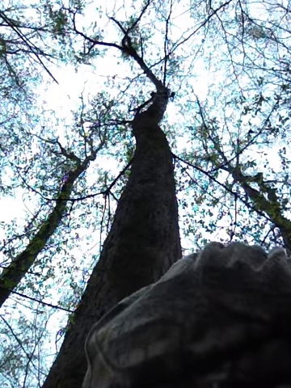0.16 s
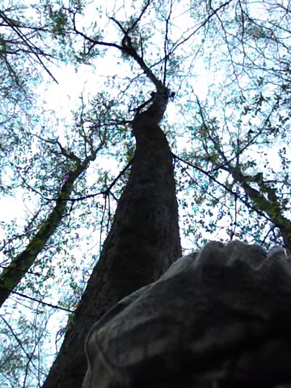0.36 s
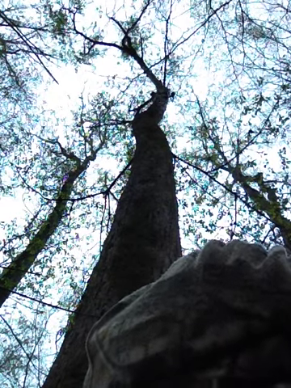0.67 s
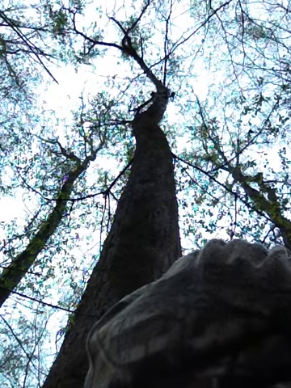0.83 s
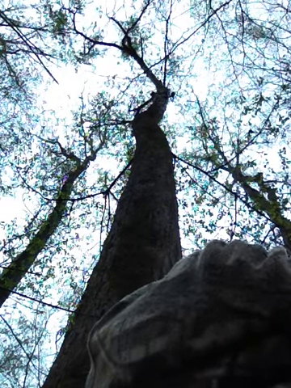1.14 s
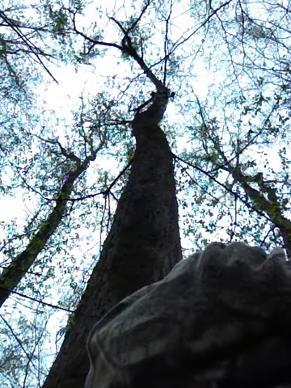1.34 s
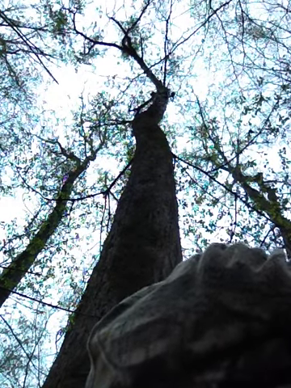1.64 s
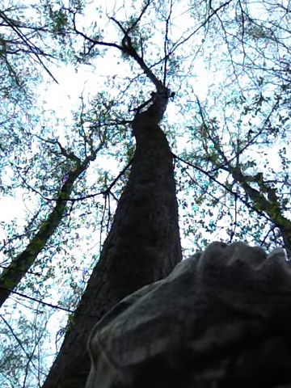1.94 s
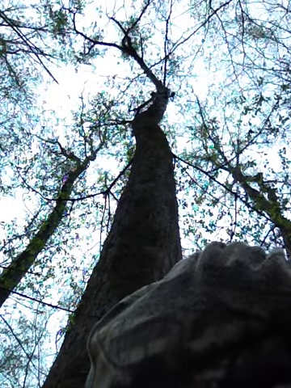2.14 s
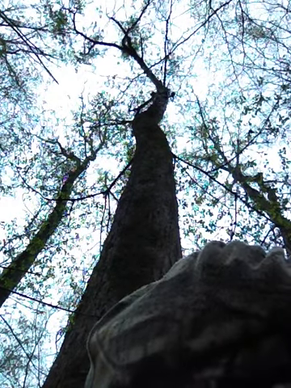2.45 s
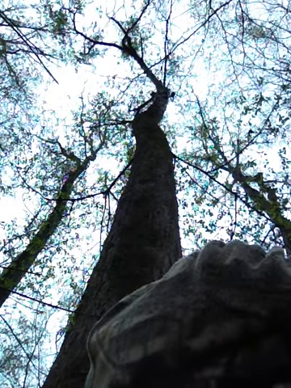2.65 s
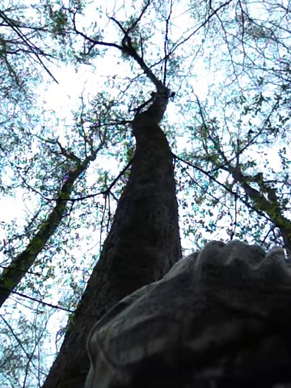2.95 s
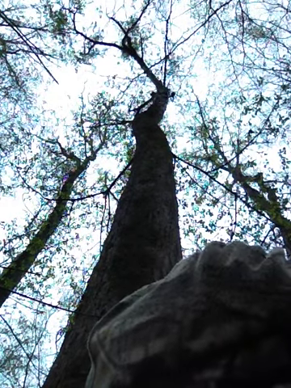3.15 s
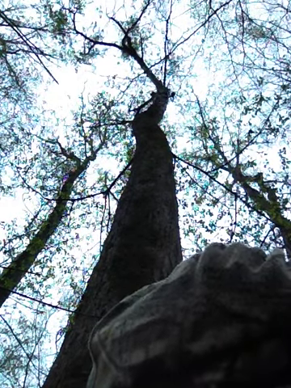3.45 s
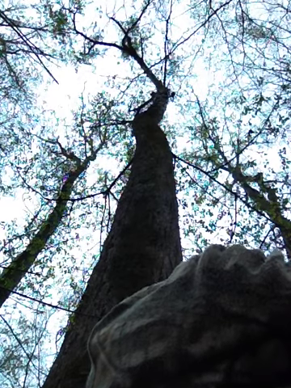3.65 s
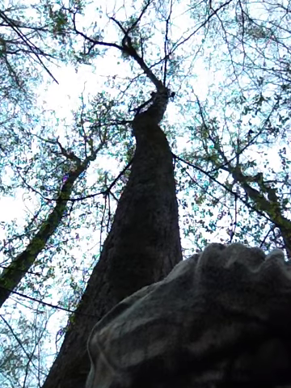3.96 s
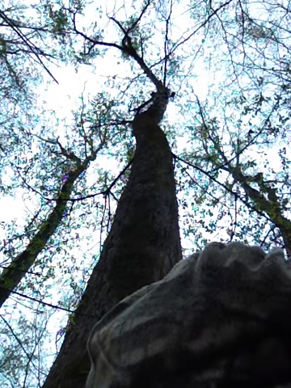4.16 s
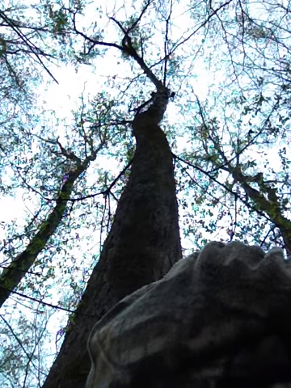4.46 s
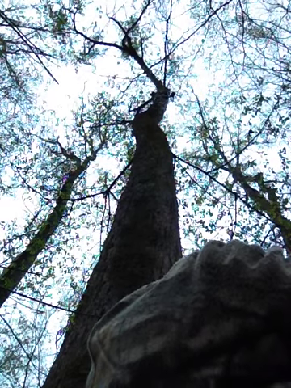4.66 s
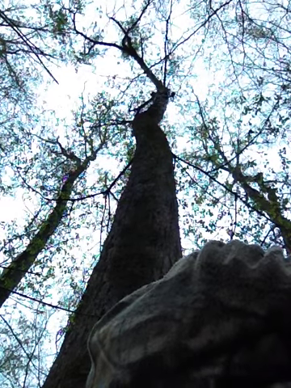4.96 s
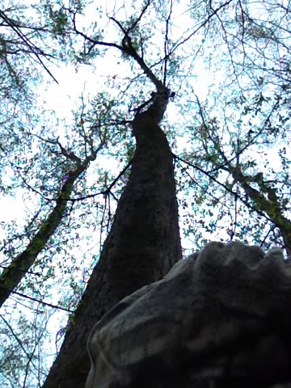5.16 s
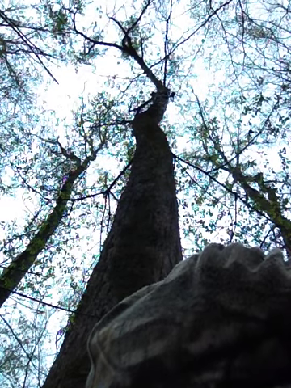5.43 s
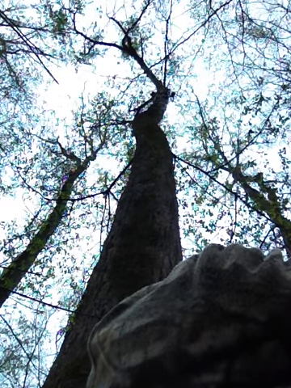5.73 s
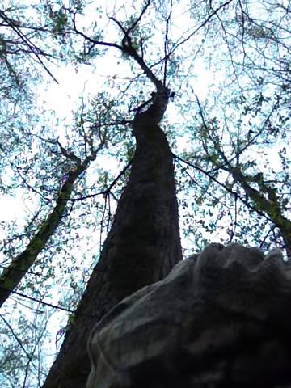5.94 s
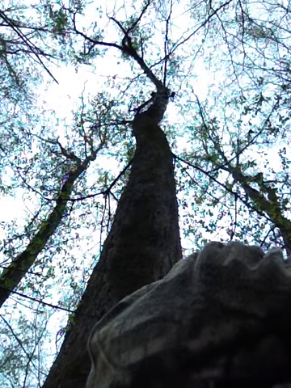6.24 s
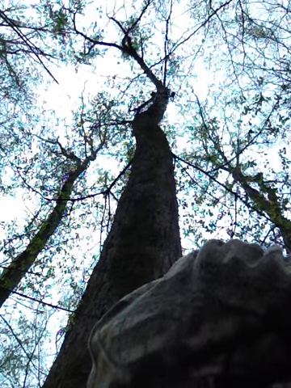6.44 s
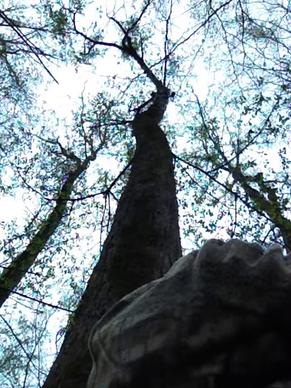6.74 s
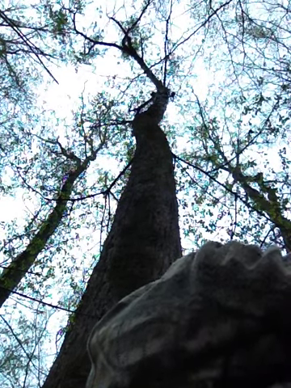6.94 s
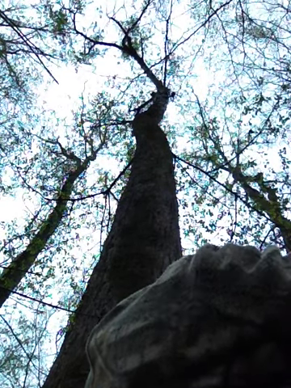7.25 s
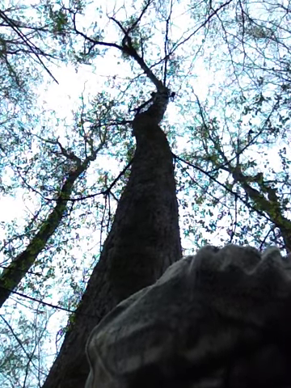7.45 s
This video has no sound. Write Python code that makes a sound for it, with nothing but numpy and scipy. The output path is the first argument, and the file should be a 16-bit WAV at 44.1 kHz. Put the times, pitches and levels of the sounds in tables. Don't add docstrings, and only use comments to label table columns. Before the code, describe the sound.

Quiet woodland in mono: low distant rumble, a wavering far engine hum and light hiss, with tiny bright leaf ticks close by, busiest in the first two seconds. From about 0.8 s a wild turkey some way off yelps five times until 1.9 s, the first two quick and weaker, the rest louder. Each yelp is a very short, reedy clear note opening with a small pop, sliding upward and cutting off, leaving a faint tail among trunks. Between 2.1 and 3 s come faint snaps and drips while the hum swells. Three quick yelps follow at 3.1 to 3.5 s. A third run starts softly at 4.25 s and strengthens, eight yelps spaced roughly a third of a second apart until 6.8 s, the later ones differently coloured as the head turns and drops. At 7.3 s a rapid double knock on a hollow casing sounds with dry snaps, then quiet.

```python
import sys
import numpy as np
from scipy import signal
from scipy.fft import rfft, irfft
from scipy.io import wavfile
from scipy.ndimage import uniform_filter1d

SR = 44100
rng = np.random.default_rng(int(sys.argv[2]) if len(sys.argv) > 2 else 0)


def unload_audio(sound):
    columns = np.transpose(np.atleast_2d(sound))
    steps = np.round(np.clip(columns, -1, 1) * 32767)
    wavfile.write(sys.argv[1], SR, steps.astype(np.int16))


def how_loud(loudness_db):
    steps = np.asarray(loudness_db, float) / 20
    return 10 ** steps


N = 335160


def at_hz(points, hz):
    points = np.array(points)
    return np.interp(np.log(hz), np.log(points[:, 0]), points[:, 1])


def drift(rate_hz, size):
    r = np.exp(-2 * np.pi * rate_hz / SR)
    slow = signal.lfilter([1], [1, -2 * r, r * r], rng.standard_normal(size + 4000))[4000:]
    return slow / np.sqrt((1 + r * r) / (1 - r * r) ** 3)


def ring(hz, t60):
    t = np.arange(4000) / SR
    return np.sin(2 * np.pi * hz * t) * how_loud(-60 * t / t60)


def bandpass(order, low_hz, high_hz, x):
    return signal.sosfilt(signal.butter(order, [low_hz, high_hz], "band", fs=SR, output="sos"), x)


def add(track, s, sound):
    i = round(s * SR)
    track[i:i + len(sound)] += sound[:max(N - i, 0)]


def turkey():
    # start t/s, crest t/s, lowest pitch f/Hz, pitch at the crest f/Hz, level/dB
    yelps = [(0.779, 0.8009, 704, 840, -33.5), (0.93, 0.9523, 716, 873, -30),
             (1.199, 1.2531, 712, 935, -24), (1.536, 1.571, 711, 943.5, -23.5),
             (1.872, 1.9076, 727, 934.6, -22.5), (3.12, 3.1436, 756, 930, -28),
             (3.2734, 3.2971, 684, 930, -24.5), (3.492, 3.52, 699, 951, -22.5),
             (4.254, 4.2796, 698, 920, -31), (4.542, 4.5998, 723, 916, -35), (4.9, 4.9824, 635.5, 948, -30),
             (5.275, 5.3385, 635.4, 960, -24.5), (5.654, 5.7224, 646, 966, -23.5),
             (6.029, 6.0943, 649, 956, -23.5), (6.3975, 6.456, 653, 944, -24),
             (6.769, 6.8245, 639.6, 953.5, -24)]
    turns_at_s = (2.5, 4.0, 4.75, 5.9)
    pops_db = [-8, -9.5, -2, -5.5, -6]
    pocket = signal.butter(3, [4850, 5700], "bandstop", fs=SR, output="sos")
    windpipe = signal.butter(6, 590, "high", fs=SR, output="sos")
    tract = np.vstack([pocket, windpipe])
    pop_rise = np.minimum(np.arange(4000) / SR / 0.004, 1)
    out = np.zeros(N)
    for row in yelps:
        start, db = row[0], row[4]
        head = np.searchsorted(turns_at_s, start)
        call = yelp(row, head)
        pop = how_loud(db - 0.5 + pops_db[head]) * 1.4 * ring(930, 0.04) * pop_rise
        add(call, .0025, pop[:len(call) - 200])
        add(out, start - .004, trunks(signal.sosfilt(tract, call)))
    return out


def yelp(row, head):
    # f/Hz, level/dB
    facing = [(1300, -3), (1800, 7), (2030, -4), (2250, -3), (2500, -3.5), (2750, -25.5), (3100, -15),
              (3600, -6.5), (4000, -10.5), (4200, -18.5), (4750, -21.5), (5300, -66.5), (7000, -32),
              (8000, -58.5)]
    # f/Hz, level/dB
    turned = [(1250, -6), (1850, 5), (2050, -7.5), (2400, -2), (2650, -23.5), (2950, -11.5), (3250, -18),
              (3550, -6), (3800, -11), (4300, -20.5), (4750, -27), (5350, -56), (7000, -28.5), (8200, -54)]
    # f/Hz, level/dB
    lowered = [(1250, -1.5), (1850, 2), (2100, -2), (2400, -19), (2650, -22), (2950, -13), (3250, -9.5),
               (3550, -20), (3850, -14), (4300, -33), (4750, -33.5), (5350, -50), (7000, -37), (8200, -59)]
    throat = (facing, facing, facing, turned, lowered)[head]
    start, crest, _, crest_hz, db = row
    size = round((round(crest - start, 2) + .05) * SR)
    t = start - .004 + np.arange(size) / SR
    age = np.maximum(t - start, 0)
    hz, low_db, high_db, tilt_db, third_db = (uniform_filter1d(c, size=70) for c in effort(row, t, head))
    start_db = -8000 * np.maximum(start - t, 0)
    after_ms = np.maximum(t - crest - .009, 0) * 1000
    phase = 2 * np.pi * np.cumsum(hz * (1 + .005 * drift(200, size))) / SR

    order = np.arange(2, 13)[:, None]
    shimmer_db = 1.13 * order ** .5 * np.array([drift(190, size) for k in order])
    colour_db = tilt_db * np.log2(order / 2) + third_db * (order == 3)
    gains = how_loud(at_hz(throat, order * hz) + colour_db + shimmer_db)
    gains /= np.sqrt(np.sum(gains ** 2, axis=0))
    top_db = 3.0 - 11 * np.exp(-age / .01) + .25 * (db + 24)
    gains *= how_loud(top_db * (order * hz > 5300))
    parted_s = t - crest + 0.0027 + .00007 * max(940 - crest_hz, 0)
    parted_ms = np.maximum(parted_s, 0) * 1000
    gains[0] *= how_loud(-2.5 * parted_ms)
    gains[1:] *= how_loud(-4.0 * parted_ms)
    overtones = np.sum(gains * np.cos(order * phase - 0.7 * order), axis=0)

    leak = how_loud(-25) + how_loud(-8) * np.exp(-age / .004)
    air = rng.standard_normal(size) * (1 - np.cos(phase))
    breath = bandpass(9, 800, 4700, leak * air)
    breath += how_loud(-48.5) * bandpass(2, 11500, 13200, air)

    low = how_loud(low_db - 3.3 * after_ms) * np.sin(phase)
    high = how_loud(high_db - 7.0 * after_ms) * (overtones + how_loud(-3.0 * parted_ms) * breath)
    return np.sqrt(2) * how_loud(start_db) * (low + high)


def effort(row, t, head):
    # creep f/Hz, overtone swell in the sweep level/dB, brightness while low dB/octave,
    # brightness in the sweep dB/octave, third partial level/dB
    heads = [
        (49.4, -4.5, 2, 6.5, 1.5),
        (50.1, -4, 0.5, 6.5, -3),
        (46.7, -2.5, -2.5, 7.5, -3.5),
        (186.3, 1.5, -5, 2, -6),
        (191, 4, 0, 1, -1),
    ]
    # f/Hz, level/dB
    pipe = [(640, -18.5), (720, -25.5), (780, -17), (850, -6), (900, -2.5), (950, 1.5), (1010, 9)]
    start, crest, low_hz, crest_hz, db = row
    creep_hz, swell_db, dull_db, bright_db, third_db = heads[head]
    age, late, length = np.maximum(t - start, 0), t - crest, crest - start

    dip_s, knee_hz = .007, 33.8
    creep = low_hz + creep_hz * np.maximum(age - dip_s, 0) / length
    sweep_hz_per_s = 11780 * how_loud(-.35 * (db + 24))
    pull = crest_hz + sweep_hz_per_s * np.minimum(late, 0.0032)
    catch = 128.5 * np.exp(-age / 0.0025)
    hz = creep + knee_hz * np.logaddexp(0, (pull - creep) / knee_hz) + catch
    swept = np.clip((hz - 800) / 110, 0, 1)

    closing_ms = 1000 * np.clip(late + 0.0012, 0, .0105)
    low_db = db + at_hz(pipe, hz) - 0.33 * closing_ms ** 2
    attack_db = -7.5 * np.exp(-age / 0.0016)
    build_db = -8.5 * np.exp(-age / 0.086 / length)
    high_db = db + attack_db + build_db + swell_db * swept
    sag_db = [-4.5, -4, -2.5, 0.5, -1.5][head]
    high_db += sag_db * np.exp(-((hz - 802) / 24) ** 2) * (age > dip_s)
    tilt_db = dull_db + (bright_db - dull_db) * swept
    return hz, low_db, high_db, tilt_db, np.full(len(t), third_db)


def trunks(x):
    t = np.arange(round(1.5 * SR)) / SR
    near, far = rng.standard_normal((2, len(t))) * np.clip(t / 0.0073, 0, 1)
    near_decay = how_loud(-50.0 - 60 * t / 0.24) + how_loud(-69.0 - 60 * t / 1.4)
    near = signal.lfilter([1, -.4], [1], near) * near_decay
    far = bandpass(1, 900, 2500, far) * how_loud(-76.5 - 60 * t / 3.06)
    path = near + far
    path[0] = 1
    add(path, .016, how_loud(-25.5) * np.hanning(24) / 12)
    return signal.fftconvolve(x, path)


def knocks():
    # t/s, peak level/dB
    blows = [
        (7.2867, -33),
        (7.2946, -28),
    ]
    # f/Hz, level/dB, t60/s
    casing = [(427, -2.5, 0.062), (680, 0.5, 0.038), (995, 4, 0.016), (2670, -5.5, 0.0069),
              (5740, -7, 0.0048)]
    out = np.zeros(N)
    for s, db in blows:
        for k, (hz, mode_db, t60) in enumerate(casing):
            add(out, s, how_loud(db - 11 + mode_db) * (-1) ** k * ring(hz, t60))
    return out


def snaps():
    # t/s, peak level/dB, brightness level/dB
    breaks = [
        (2.1246, -45, -16),
        (2.4376, -57.5, 4),
        (2.6246, -57, 5),
        (2.963, -63, -7.5),
        (7.266, -51, -20),
        (7.286, -54, -5),
        (7.2927, -40.5, -23),
        (7.3295, -39, -21),
        (7.3472, -53, -11),
        (7.3785, -55, -20),
    ]
    out, t = np.zeros(N), np.arange(400) / SR
    for s, db, bright_db in breaks:
        crack = rng.standard_normal(400) * how_loud(db - 9.0 - 60 * t / 0.0083)
        add(out, s, crack + how_loud(bright_db) * np.diff(crack, prepend=0))
    return out


def leaves():
    # t/s, peak level/dB
    clear = [(0.0293, -56), (0.0518, -59), (0.1376, -57), (0.3492, -54), (0.3865, -57), (0.4823, -57),
             (0.5995, -56), (0.6584, -58), (0.6988, -53), (0.8573, -55), (1.035, -56), (1.1867, -50),
             (1.35, -54), (1.4107, -54), (1.6398, -55), (1.722, -59), (1.8188, -58), (2.3223, -56.5),
             (2.6489, -54), (3.0814, -58), (3.6716, -55.5), (4.2228, -53.5), (4.6633, -53.5), (4.7735, -56),
             (5.4271, -57), (5.8153, -55.5), (5.9958, -53), (6.2028, -56.5), (6.352, -54), (7.5133, -56)]
    # t/s, rate/(1/s)
    stir = [(0, 15), (1.8, 15), (2.0, 6), (7.6, 8)]
    t = np.arange(400) / SR
    cracks = rng.standard_normal(N) * how_loud(-85 + 4.8 * drift(40, N))
    slot_s = .004
    slots = np.arange(0, N / SR, slot_s)
    stirred = rng.random(len(slots)) < slot_s * np.interp(slots, *np.transpose(stir))
    faint_db = -58.5 + 1.5 * rng.standard_normal(len(slots))
    faint = np.transpose([slots, faint_db])[stirred]
    for s, db in [*clear, *faint]:
        for k in range(3):
            tick = rng.standard_normal(400) * how_loud(-60 * t / .012)
            tick_db = db - 12.5 - k * rng.uniform(0, 9)
            add(cracks, s + k * rng.uniform(0.0058, .012), how_loud(tick_db) * tick / tick.std())
    rustle = bandpass(3, 6200, 10800, cracks)
    return rustle + how_loud(2.5) * signal.lfilter(*signal.iirpeak(9850, 14, fs=SR), cracks)


def drips():
    # t/s, peak level/dB, f/Hz
    drops = [
        (0.4835, -61, 1670),
        (2.1782, -56, 1650),
        (2.4375, -56, 1600),
        (2.623, -60, 1990),
        (2.7412, -62, 1650),
        (2.9626, -56, 3340),
        (7.342, -58.5, 3410),
        (7.3447, -60, 1556),
    ]
    out, t = np.zeros(N), np.arange(400) / SR
    for s, db, hz in drops:
        splash = rng.standard_normal(400) * how_loud(-9.5 - 60 * t / .015)
        splash = signal.lfilter([1], [1, -.7], splash)
        add(out, s, how_loud(db) * (ring(hz, .02)[:400] + splash))
    return out


def drone():
    # t/s, width/s, firing line level/dB, second order level/dB
    swells = [
        (0.0, 0.16, -74.5, -64),
        (1.4, 0.32, -93, -71),
        (2.3, .35, -69, -60.5),
        (3.3, 0.62, -68, -66.5),
        (5.05, 0.23, -81, -64.5),
        (6.12, 0.078, -75.5, -78.5),
        (7.2, 0.59, -75.5, -73.5),
    ]
    s, width, first_db, second_db = np.transpose(swells)[:, :, None]
    swell = np.exp(-((np.arange(N) / SR - s) / width) ** 2)
    firing_hz = 107.5 * (1 + .004 * drift(3, N))
    phase = 2 * np.pi * np.cumsum(firing_hz) / SR
    first = how_loud(-88) + np.sum(how_loud(first_db) * swell, axis=0)
    second = how_loud(-91) + np.sum(how_loud(second_db) * swell, axis=0)
    first = first * how_loud(1.2 * drift(6, N)) * np.sin(phase)
    return first + second * how_loud(0.5 * drift(5, N)) * np.sin(2 * phase)


def woods():
    # f/Hz, level per Hz/dB
    spectrum = [(24, -46), (60, -30.5), (85, -20), (100, -8), (175, -5.5), (210, -1.5), (416, -13),
                (580, -12.5), (700, -19.5), (1560, -25.5), (9800, -34), (11500, -39), (14800, -30.5),
                (16000, -31.5)]
    hz = np.arange(N // 2 + 1) * SR / N + 1
    noise = irfft(rfft(rng.standard_normal(N)) * how_loud(at_hz(spectrum, hz)), N)
    return how_loud(-64.0 + 0.2 * drift(6.4, N)) * noise / noise.std()


def scene():
    near = knocks() + snaps() + leaves() + drips()
    return (turkey() + near + drone() + woods())[None]


def band_limit(x):
    return signal.sosfilt(signal.butter(12, 15470, fs=SR, output="sos"), x)


def record(dry):
    mic = signal.sosfilt(signal.butter(2, 60, "high", fs=SR, output="sos"), dry)
    mic = signal.sosfilt(signal.ellip(12, .5, 70, 15400, fs=SR, output="sos"), mic)
    return band_limit(mic)


dry = scene()
out = record(dry)
unload_audio(out)
```